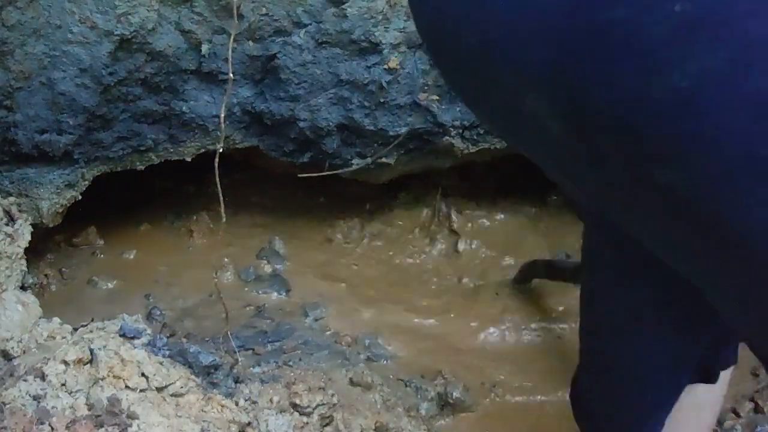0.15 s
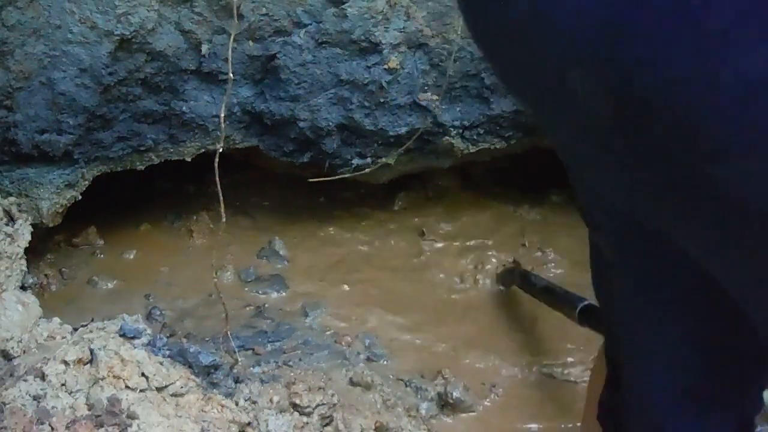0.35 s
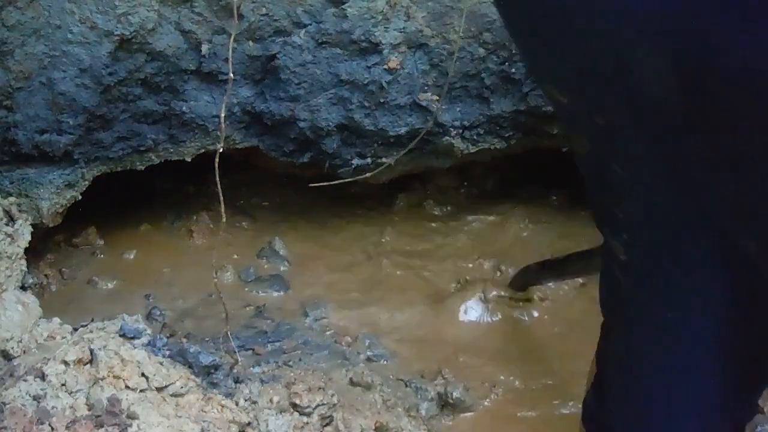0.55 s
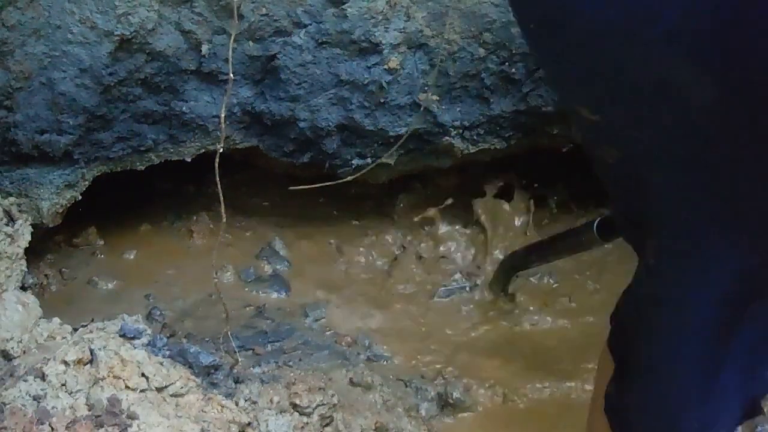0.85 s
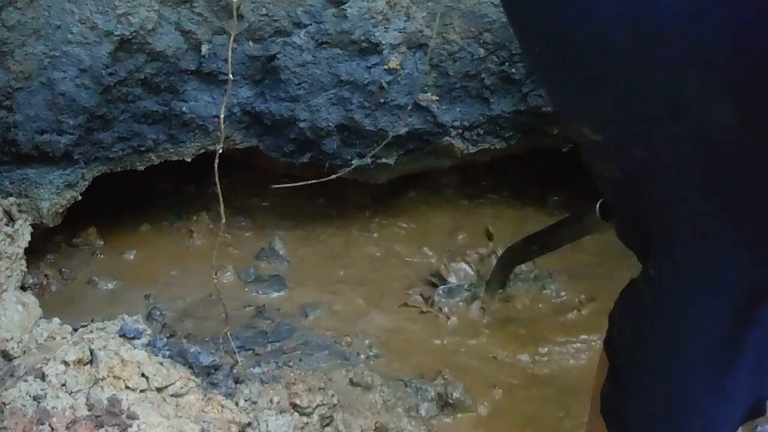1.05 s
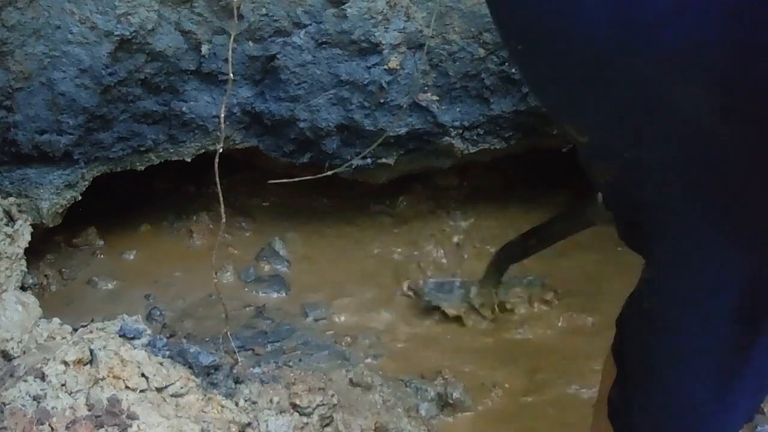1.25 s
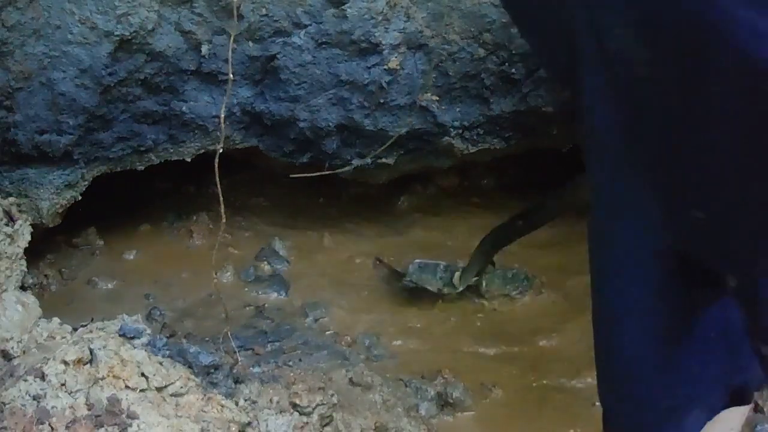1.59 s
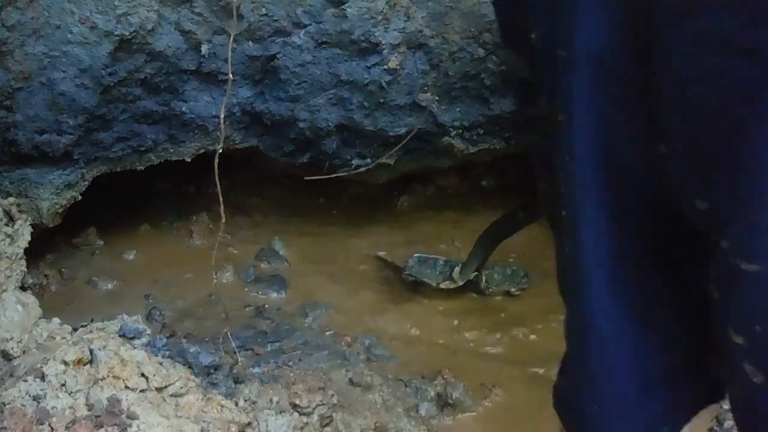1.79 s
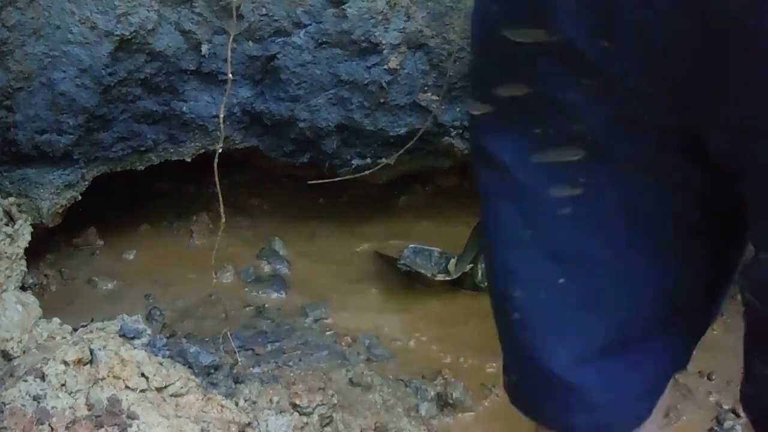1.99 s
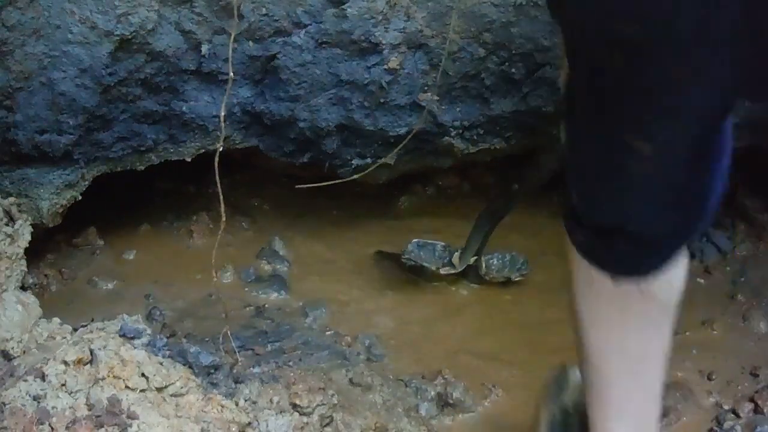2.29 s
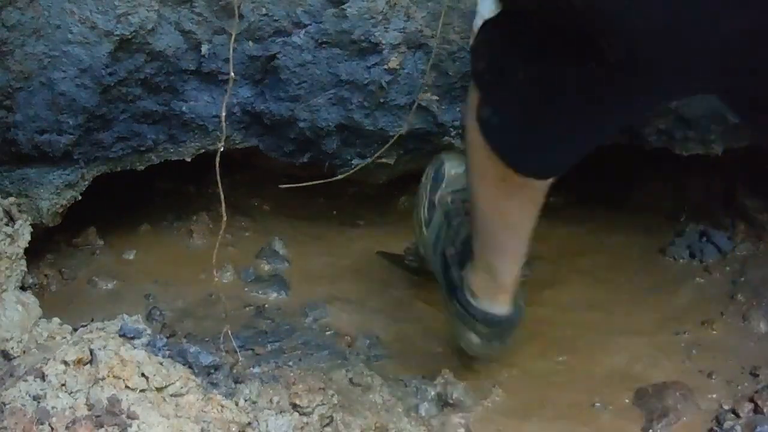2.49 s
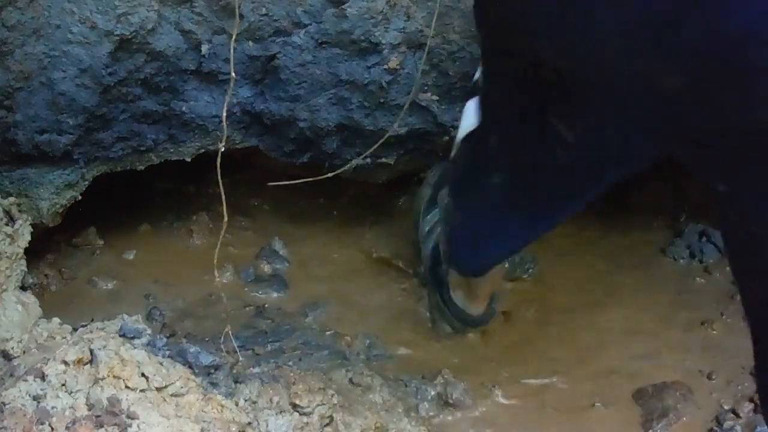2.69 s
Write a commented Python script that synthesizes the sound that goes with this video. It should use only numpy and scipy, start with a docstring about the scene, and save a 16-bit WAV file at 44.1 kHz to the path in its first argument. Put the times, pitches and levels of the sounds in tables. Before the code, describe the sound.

Wet splashing and glugging in shallow muddy water, over a steady low engine chug and hiss

```python
"""Under a bank: a hoe and a foot slop about in shallow muddy water; a small one-cylinder engine runs nearby.
Splashes are bursts of droplet spray over a ringing air pocket and a swarm of bubbles; they ring a steel blade.
Mud glugs as fluttering noise and thuds as dying sines; small bubbles churn; water and engine hiss on steadily.
The engine is a train of firing pulses that ring the exhaust.
The recorder hears it in mono, turns its gain down for loud splashes and clips the highest peaks."""
import sys
import numpy as np
from scipy import signal
from scipy.fft import rfft, irfft
from scipy.io import wavfile
from scipy.ndimage import uniform_filter1d

SR = 44100
rng = np.random.default_rng(int(sys.argv[2]) if len(sys.argv) > 2 else 0)


def invert_db(x):
    """Field ratio 10**(x/20) for x, a level in decibels (scalar or array-like)."""
    u = np.asarray(x, float) / 20
    return 10 ** u


def put_to_file(sound):
    """Save the sound as 16-bit audio at rate SR, in the file named by the first command-line argument."""
    columns = np.atleast_2d(sound).T  # one column per channel
    safe = np.clip(columns, -1, 1)
    whole_steps = np.round(safe * 32767)
    wavfile.write(sys.argv[1], SR, whole_steps.astype(np.int16))


N = 125244

# colour of the water spray: columns hz [Hz], density_db [dB per Hz, relative]
SPRAY_COLOUR = [(530, -14), (900, -17), (1210, -26), (1350, -13), (2100, -12), (2310, -9.5), (2760, -8.5),
                (3220, -11.5), (4390, -5), (5710, -11.5), (7510, -5.5), (10200, -13.5), (15500, -36.5)]


def unit(x):
    """Scale to rms 1."""
    return x / np.sqrt(np.mean(x ** 2) + 1e-20)


def colour(x, points):
    """Shape the spectrum of white noise through (Hz, dB) points; rms 1."""
    hz, db = np.transpose(points)
    f = np.maximum(np.arange(N // 2 + 1) * SR / N, 1)
    gain_db = np.interp(np.log(f), np.log(hz), db, left=-90, right=-90)
    return unit(irfft(rfft(x) * invert_db(gain_db), N))


def drift(rate_hz):
    """Slow random wander of rms 1: noise through two equal one-pole lowpasses."""
    r = np.exp(-2 * np.pi * rate_hz / SR)
    wander = signal.lfilter([1], [1, -2 * r, r * r], rng.standard_normal(N + SR))
    return unit(wander[SR:])  # the first second lets the filter settle


def ring(clicks, hz, t60_s):
    """A two-pole resonator: each unit click rings as a dying sine."""
    r = invert_db(-60 / (t60_s * SR))
    w = 2 * np.pi * hz / SR
    return signal.lfilter([0, np.sin(w)], [1, -2 * r * np.cos(w), r * r], clicks + 1e-18)


def resonate(x, hz, q):
    """Noise twice through one resonance; rms 1."""
    b, a = signal.iirpeak(hz, q, SR)
    return unit(signal.lfilter(b, a, signal.lfilter(b, a, x)))


def add(out, start_s, x):
    """Mix x in from start_s, cut off at the end of the scene."""
    i = int(start_s * SR)
    part = out[i:i + len(x)]
    part += x[:len(part)]


def grains():
    """Dense tiny droplet impacts of uneven size and random sign."""
    grains_per_s, spread_db = 6000, 3.5
    sizes = invert_db(spread_db * np.minimum(rng.exponential(1, N), 5))
    return sizes * rng.choice([-1, 1], N) * (rng.random(N) < grains_per_s / SR)


def hiss():
    """Steady noise of water and engine that flickers as a whole and is patchy band by band."""
    # hiss spectrum: columns hz [Hz], density_db [dB per Hz, relative]
    hiss_colour = [(150, -11), (250, -3), (292, -5.5), (442, 2), (681, -8), (838, -5.5), (1100, -12),
                   (1990, -4.5), (2400, -5), (4110, -0.5), (5900, -7), (7650, 2), (8490, -2.5),
                   (12900, -44), (15500, -40)]
    hiss_db, flicker_db, flicker_hz = -19, 1.5, 70
    patchy_db, patches_hz = 1.2, 20
    spectrum = rfft(colour(rng.standard_normal(N), hiss_colour))
    octave = np.log2(np.maximum(np.arange(N // 2 + 1) * SR / N, 1) / 250)
    patchy = np.zeros(N)
    for k in range(-2, 14):  # overlapping triangular bands, half an octave apart
        band = irfft(spectrum * np.maximum(1 - np.abs(2 * octave - k), 0), N)
        patchy += invert_db(patchy_db * drift(patches_hz)) * band
    return invert_db(hiss_db + flicker_db * drift(flicker_hz)) * unit(patchy)


def engine():
    """Each firing sends an uneven pulse that rings the exhaust; a low engine order hums as a sine."""
    # engine speed: columns time_s [s], firing_rate_hz [firings per second]
    firing_speed = [(0.0, 25.98), (0.08, 25.1), (0.58, 25.25), (0.91, 24.45), (1.22, 24.47), (1.49, 25.4),
                    (1.68, 24.53), (2.84, 25.26)]
    # exhaust resonances: columns hz [Hz], strength_db [dB, relative], t60_s [s]
    exhaust_modes = [(100.5, -9, 0.22), (143.1, 13, 0.08), (227.5, 6.5, 0.15), (370, 7, 0.027),
                     (458, 4.5, 0.097), (500, 0.5, 0.13), (600, -1, 0.12), (818, 1.5, 0.074)]
    # humming order: columns order [multiple of the firing rate], rms_db [dB before the bed level]
    hum_orders = [(2, -36.5)]
    first_firing_s, firing_spread_db = 0.011, 1.5
    exhaust_db, exhaust_cut_hz = -24.5, 109
    t = np.arange(-SR // 2, N) / SR  # the half second ahead lets the exhaust settle
    firings = np.cumsum(np.interp(t, *np.transpose(firing_speed))) / SR
    firings = firings - np.interp(first_firing_s, t, firings)
    count = np.floor(firings)
    clicks = np.diff(count, prepend=count[0]) * invert_db(firing_spread_db * rng.standard_normal(len(t)))
    tone = sum(invert_db(db) * ring(clicks, hz, t60_s) for hz, db, t60_s in exhaust_modes)
    tone = signal.sosfilt(signal.butter(6, exhaust_cut_hz, "high", fs=SR, output="sos"), tone)
    hum = sum(invert_db(db) * np.sqrt(2) * np.sin(2 * np.pi * order * firings) for order, db in hum_orders)
    return (hum + invert_db(exhaust_db) * unit(tone))[SR // 2:]


def churn():
    """Water stirred around tool and foot: random small bubbles, each a dying sine, and a wash of spray."""
    # stirring: columns time_s [s], bubbles_db [dB, rms of the bubbles]
    stirring = [(0, -37.5), (.07, -24.5), (.16, -27), (.23, -25.5), (.33, -25.5), (.46, -24.5),
                (.62, -23.5), (.75, -27), (.87, -26), (.96, -22), (1.1, -28), (1.188, -22.5), (1.331, -30),
                (1.5, -22.5), (1.6, -26), (1.8, -28), (1.96, -27.5), (2.08, -23.5), (2.25, -28.5),
                (2.45, -30), (2.552, -28.5), (2.68, -24), (2.84, -26.5)]
    bubbles_per_s, ring_cycles, low_hz, high_hz = 1000, 26, 850, 5990
    spread_db, wash_db = -2, 4  # wash relative to the bubbles
    sizes = invert_db(spread_db * np.minimum(rng.exponential(1, N), 4))
    births = sizes * (rng.random(N) < bubbles_per_s / SR) * rng.choice([-1, 1], N)
    dealt = rng.integers(0, 24, N)  # which of 24 pitches each bubble gets
    bubbles = np.zeros(N)
    for k, hz in enumerate(np.geomspace(low_hz, high_hz, num=24)):
        bubbles += ring(births * (dealt == k), hz, ring_cycles / hz)
    wash = invert_db(wash_db) * colour(grains(), SPRAY_COLOUR)
    stir = invert_db(np.interp(np.arange(N) / SR, *np.transpose(stirring)))
    return stir * (unit(bubbles) + wash)


def glugs():
    """Air glugging in mud: hollow resonant noise and a broader slosh, fluttering under a smooth swell."""
    # glugs: columns middle_s [s], level_db [dB, relative], half_length_s [s], pitch_hz [Hz]
    mud_glugs = [(.48, -25, 0.06, 321), (.645, -19.5, 0.072, 468), (0.697, -19.5, 0.039, 600),
                 (0.899, -16.5, 0.038, 844), (0.931, -22, 0.041, 480), (1.047, -14.5, 0.012, 1250),
                 (1.271, -4, 0.012, 1210), (1.28, -19, 0.018, 600), (1.591, -17.5, 0.025, 790),
                 (1.665, -19.5, 0.041, 780), (1.739, -24, 0.027, 480), (1.797, -19.5, 0.024, 356),
                 (1.825, -18, 0.043, 630), (1.858, -13.5, 0.05, 780), (1.884, -17.5, 0.058, 378),
                 (1.913, -16, 0.022, 517), (2.07, -20.5, 0.025, 500), (2.119, -19.5, 0.051, 771),
                 (2.124, -22, 0.055, 370), (2.492, -17, 0.017, 544), (2.636, -2, 0.016, 1106),
                 (2.625, -11.5, 0.035, 291), (2.639, -18, 0.02, 600), (2.663, -18, 0.028, 370),
                 (1.661, -20.5, 0.056, 363), (0.266, -21.5, 0.035, 850)]
    glug_q, slosh_q, slosh_ratio, slosh_db = 5, 1.5, 1.336, -3.5
    flutter_db, flutter_hz = 1, 120
    out = np.zeros(N)
    for middle_s, db, half_s, hz in mud_glugs:
        noise = rng.standard_normal(SR // 4)
        n = int(2 * half_s * SR)
        hollow = resonate(noise, hz, glug_q)
        slosh = invert_db(slosh_db) * resonate(noise[::-1], slosh_ratio * hz, slosh_q)
        swell = np.hanning(n) * (hollow + slosh)[-n:]
        add(out, middle_s - half_s, invert_db(db) * unit(swell) / 2)
    return out * invert_db(flutter_db * drift(flutter_hz))


def thuds():
    """Tool and foot thud dully in the mud: a soft push rings it as a dying sine."""
    # thuds: columns start_s [s], level_db [dB, before the soft onset], pitch_hz [Hz], t60_s [s]
    mud_thuds = [(.688, -18, 62, .09), (1.01, 3, 140, .028), (1.545, -16, 60, .08), (2.612, 0, 147, .07),
                 (2.64, -20, 58, .25)]
    out, t = np.zeros(N), np.arange(SR // 4) / SR
    for start_s, db, hz, t60_s in mud_thuds:
        push = 1 - np.exp(-t / 0.002)
        add(out, start_s, invert_db(db - 60 * t / t60_s) * np.sin(2 * np.pi * hz * t) * push)
    return out


def swarm(t, shape, hz):
    """A dozen bubbles born during a splash, each a dying sine that climbs in pitch."""
    low_oct, high_oct = -0.257, 0.94  # range around the pocket's pitch
    decay_cycles, climb_per_cycle = 91, 0.0043  # cycles to fall 60 dB
    draws = rng.random((12, 2))
    share = np.cumsum(shape) / np.sum(shape)
    birth = np.interp(draws[:, :1], share, t) - 0.0035  # most are born where the splash is strong
    age = np.maximum(t - birth, 0)
    pitch = np.minimum(hz * 2 ** (low_oct + (high_oct - low_oct) * draws[:, 1:]), 0.3 * SR)
    cycles = pitch * age
    tones = np.sin(2 * np.pi * cycles * (1 + climb_per_cycle * cycles))
    return unit(np.sum(invert_db(-60 * cycles / decay_cycles) * tones, axis=0))


def splashes():
    """Spray swells and dies around each peak; noise excites an air pocket whose pitch climbs as it closes."""
    # splashes: columns peak_s [s], spray_db [dB], rise_s [s], fall_s [s], pocket_hz [Hz], pocket_db [dB]
    splash_events = [(0.09, -18, .006, 0.017, 2290, -18), (0.123, -16.5, 0.0025, 0.017, 2600, -24),
                     (0.194, -32, 0.012, 0.012, 1770, -23), (0.247, -11.5, 0.038, 0.0094, 3080, -24),
                     (0.267, -4.5, 0.0084, 0.013, 1740, -15), (.403, -23, 0.003, 0.005, 3020, -13.5),
                     (.463, -12, 0.013, 0.012, 4200, -28), (0.543, -16, 0.021, 0.026, 2270, -32.5),
                     (0.577, -15, 0.015, 0.0059, 2100, -45), (.652, -9, 0.01, 0.02, 2630, -15),
                     (0.677, -30, 0.011, 0.0093, 1670, -16), (0.685, -22, .008, 0.0085, 2490, -11),
                     (.908, -13.5, 0.024, 0.0097, 2260, -19.5), (0.981, -25, .012, 0.013, 1255, -19),
                     (1.013, -5, 0.022, 0.01, 1655, -14.5), (1.074, -11, 0.0012, 0.004, 4200, -27),
                     (1.212, -27, .02, 0.01, 3680, -15), (1.221, -15, 0.0068, 0.014, 1660, -12),
                     (1.232, -10.5, 0.0096, 0.013, 2270, -7.5), (1.259, -14.5, 0.0096, 0.0068, 4000, -25),
                     (1.381, -22, 0.004, 0.0036, 4000, -28), (1.268, -13, 0.0029, 0.016, 2240, -3.5),
                     (1.445, -11.5, 0.02, 0.009, 4170, -50), (1.466, -9, 0.016, 0.019, 2690, -10),
                     (1.547, -11.5, 0.0051, 0.017, 2520, -10.5), (1.589, -14.5, 0.027, 0.0047, 2220, -32.5),
                     (1.674, -11.5, 0.015, 0.0088, 4270, -39), (1.74, -29, 0.0061, 0.0072, 4900, -11.5),
                     (1.866, -12.5, 0.031, 0.033, 1530, -27), (1.906, -6, 0.004, 0.0075, 4150, -19),
                     (2.125, -11, 0.01, 0.015, 7500, -42), (2.141, -3.5, 0.0049, 0.016, 2090, -11),
                     (2.167, -11, 0.0061, 0.007, 3580, -9), (2.176, -4.5, 0.0039, 0.0093, 2190, -12.5),
                     (2.401, -8, 0.0004, 0.0025, 4450, -10.5), (2.564, -15, 0.016, 0.029, 2060, -23),
                     (2.594, 0, 0.00148, 0.0092, 2190, -5), (2.615, 2.5, 0.00197, 0.014, 2500, -11),
                     (2.628, -15, .005, .013, 1467, -0.5), (2.705, -16, 0.0018, 0.01, 4300, -15),
                     (2.738, -10, 0.0019, 0.0031, 4200, -19), (2.78, -23, 0.00284, 0.0029, 3050, -14.5),
                     (2.185, -25, 0.008, 0.0086, 1680, -17.5), (2.489, -19, 0.002, 0.0052, 2770, -18),
                     (2.668, -21, 0.0071, 0.0088, 1320, -23)]
    pocket_q, pocket_climb = 2.4, 0.1  # climb: fraction of the pitch either side of the peak
    upper_ratio, upper_db, swarm_db = 1.51, -3, -7  # second resonance and bubbles, relative to the pocket
    mist_hz, mist_db, mist_per_db = 12000, -11, 0.1  # finest spray: gain at -15 dB, and its growth with level
    lead = 400  # samples for the pocket's resonances to settle
    out, spray, drops = np.zeros(N), colour(grains(), SPRAY_COLOUR), rng.standard_normal(N)
    coarse = signal.sosfiltfilt(signal.butter(2, mist_hz, fs=SR, output="sos"), spray)
    fine = spray - coarse
    for peak_s, spray_db, rise_s, fall_s, hz, pocket_db in splash_events:
        t = np.arange(int(-3 * rise_s * SR), int(4 * fall_s * SR)) / SR
        shape = np.exp(-np.where(t < 0, (t / rise_s) ** 2, (np.abs(t) / fall_s) ** 1.5))
        i = int((peak_s + t[0]) * SR)
        span = slice(i, i + len(t))

        drive = drops[i - lead:i + 2 * len(t)]
        rings = resonate(drive, hz, pocket_q)
        rings = rings + invert_db(upper_db) * resonate(drive, upper_ratio * hz, pocket_q)
        # reading the ringing ever faster makes its pitch climb
        place = np.cumsum(1 + pocket_climb * np.tanh(t / fall_s))
        pocket = np.interp(place, np.arange(len(rings) - lead), rings[lead:])
        pocket = pocket + invert_db(swarm_db) * swarm(t, shape, hz)
        pocket = pocket * np.sqrt(np.sum(shape ** 2) / np.sum((shape * pocket) ** 2))

        mist = fine[span] * invert_db(mist_db + mist_per_db * (spray_db + 15))
        burst = invert_db(spray_db) * (coarse[span] + mist) + invert_db(pocket_db) * pocket
        add(out, peak_s + t[0], shape * burst)
    return out


def blade(push):
    """The wet steel blade: moving water shakes its damped modes."""
    # blade modes: columns hz [Hz], gain_db [dB], t60_s [s]
    blade_modes = [(1650, -46, .035), (2060, -41, .045), (2190, -42, .045), (2680, -41, .04),
                   (3620, -41, .04), (4200, -39, .025), (4690, -44, .03), (7220, -43, .03)]
    return sum(invert_db(db) * ring(push, hz, t60_s) for hz, db, t60_s in blade_modes)


def scene():
    """All sources at the microphone, the same in both channels."""
    # level of engine and hiss together, sagging slowly and returning: columns time_s [s], gain_db [dB]
    bed_level = [(.45, 2), (1.8, 0.5), (2.22, -1), (2.7, 1)]
    bed = invert_db(np.interp(np.arange(N) / SR, *np.transpose(bed_level))) * (engine() + hiss())
    wet = splashes() + churn()
    mono = bed + wet + blade(wet) + glugs() + thuds()
    return np.array([mono, mono])


def top_cut(x):
    """Nothing passes above the cut-off."""
    return signal.sosfilt(signal.butter(12, 15690, fs=SR, output="sos"), x)


def record(dry):
    """The recorder's gain falls fast above a knee and creeps back; the highest peaks clip."""
    knee_db, squeeze = -13.5, 0.57  # squeeze: dB of cut per dB over the knee
    sense_s, attack_s, release_db_per_s = 0.0027, 0.048, 17
    gain_db, clip_top = 0.5, 0.86
    power = uniform_filter1d(dry[0] ** 2, size=int(sense_s * SR))
    over = np.maximum(10 * np.log10(power + 1e-12) - knee_db, 0) * squeeze
    release = release_db_per_s * np.arange(N) / SR
    held = np.maximum.accumulate(over + release) - release  # jumps up, then falls in a straight line
    r = np.exp(-1 / (attack_s * SR))
    cut_db = signal.lfilter([1 - r], [1, -r], held)
    mix = np.clip(dry * invert_db(gain_db - cut_db), -clip_top, clip_top)
    return top_cut(mix)


dry = scene()
out = record(dry)
put_to_file(out)
```